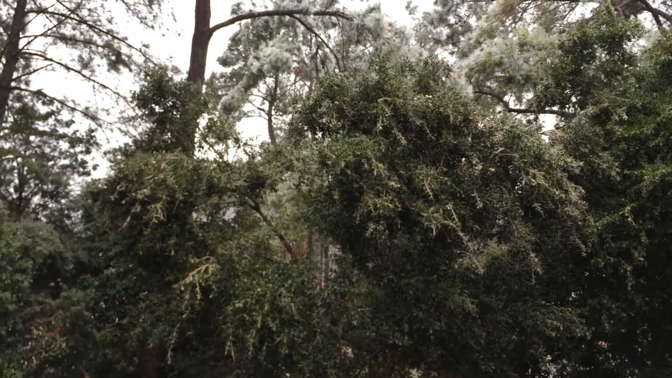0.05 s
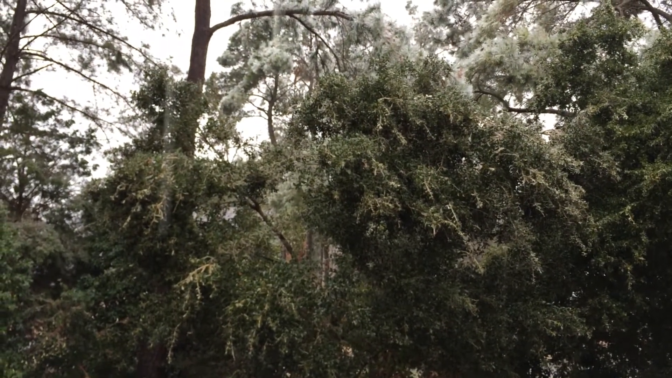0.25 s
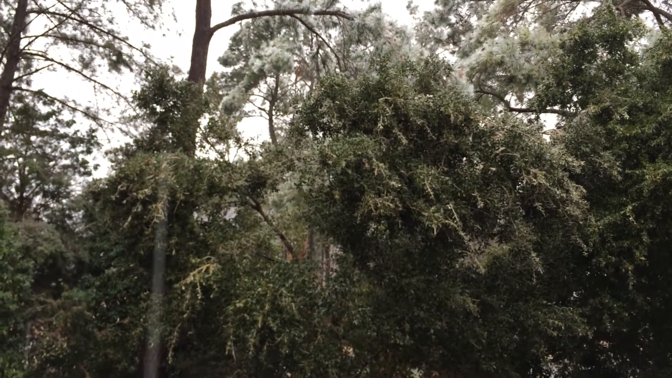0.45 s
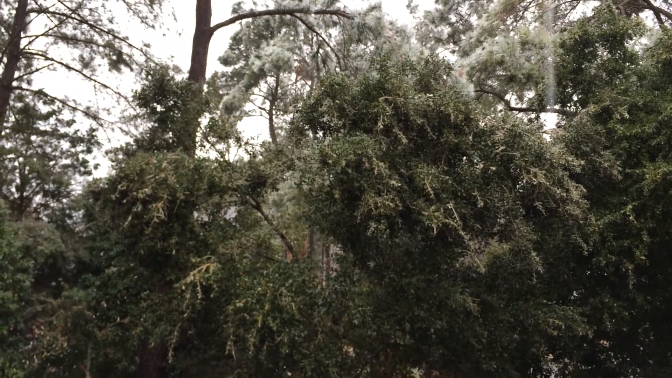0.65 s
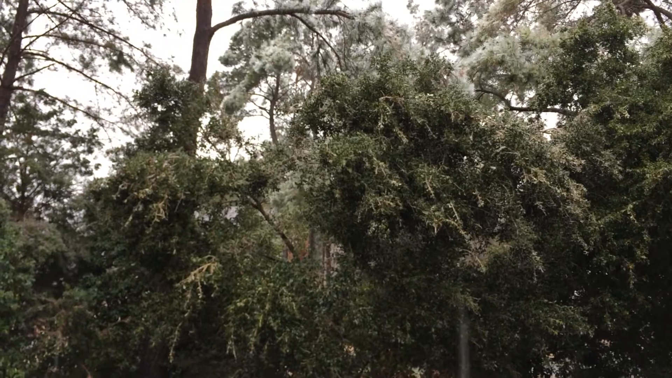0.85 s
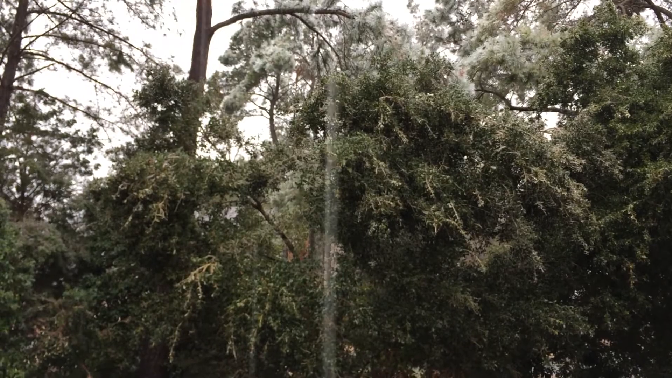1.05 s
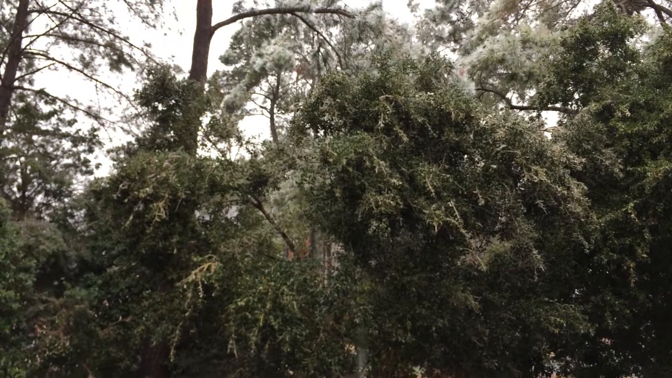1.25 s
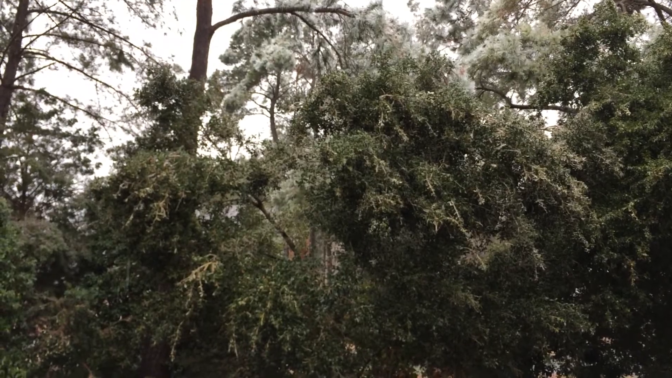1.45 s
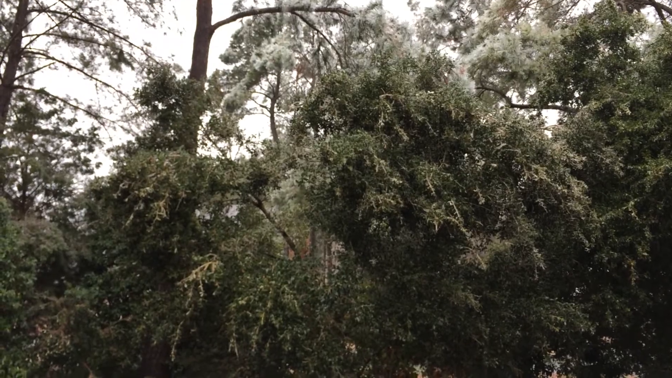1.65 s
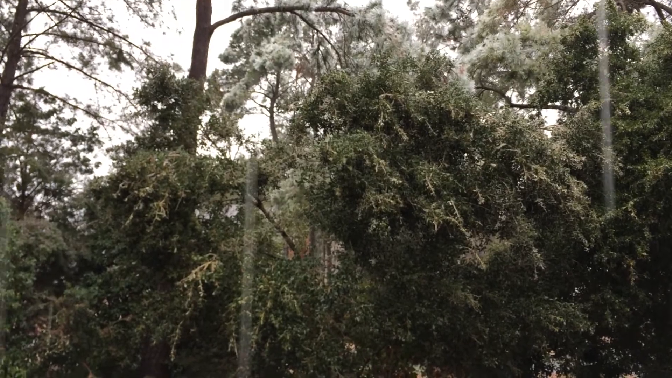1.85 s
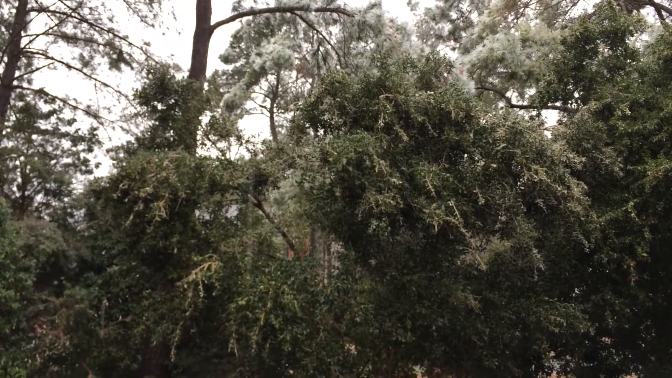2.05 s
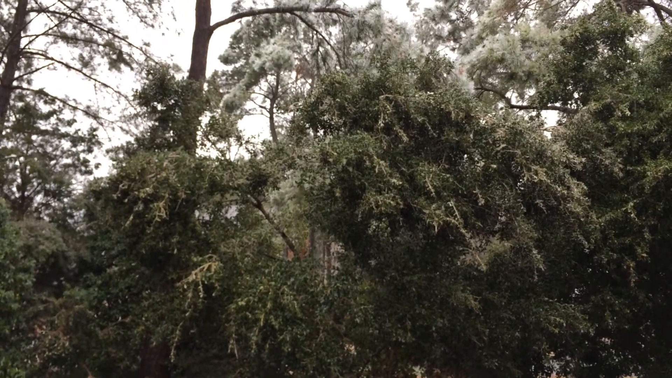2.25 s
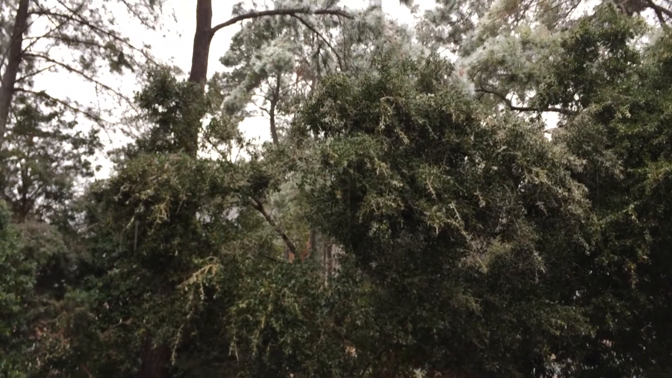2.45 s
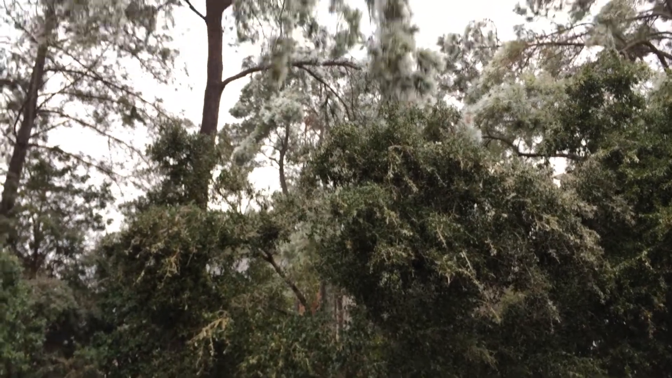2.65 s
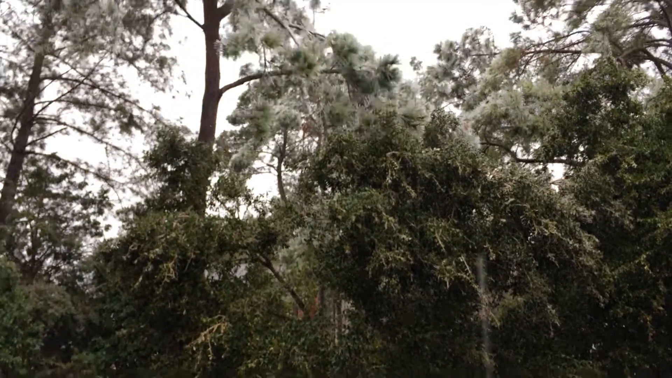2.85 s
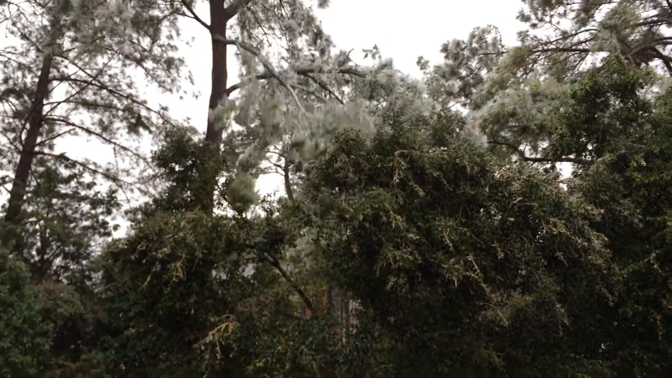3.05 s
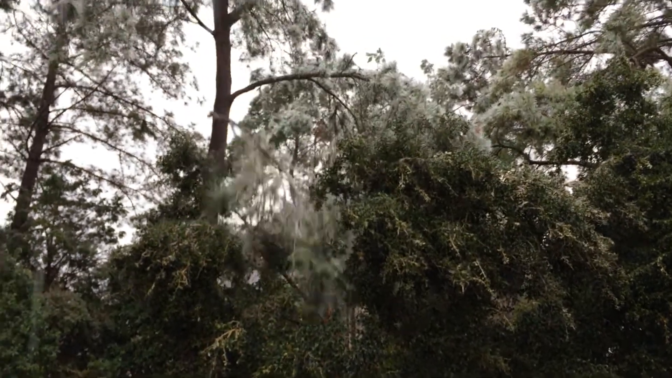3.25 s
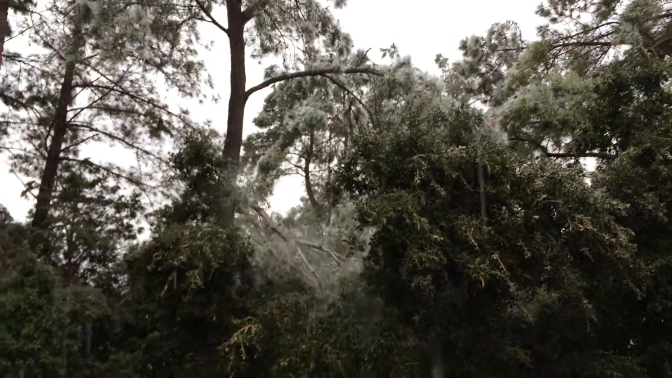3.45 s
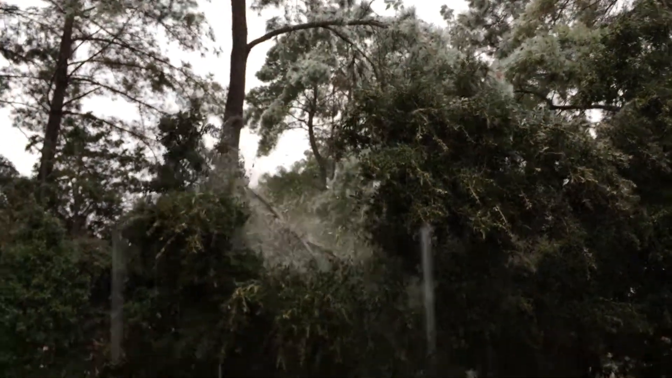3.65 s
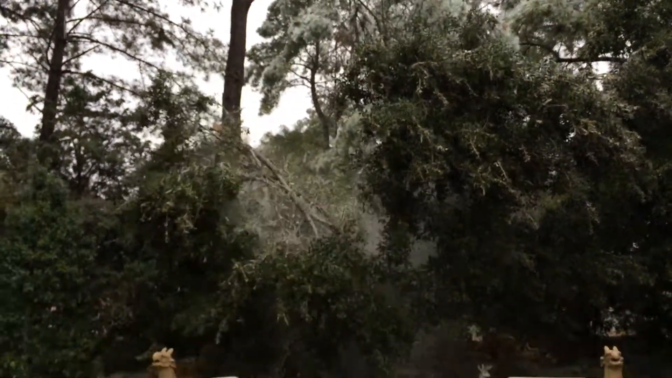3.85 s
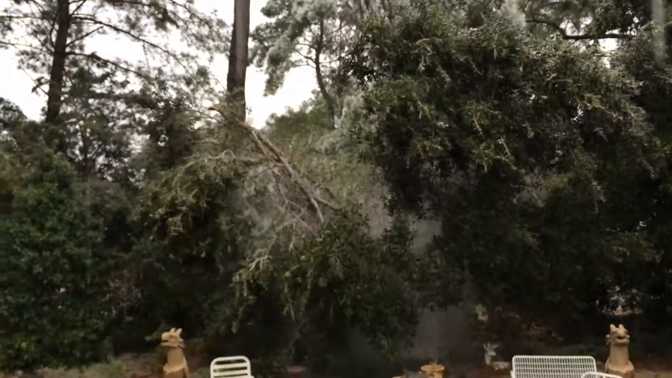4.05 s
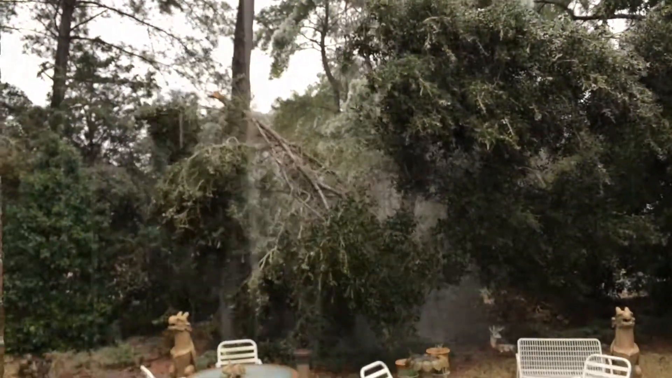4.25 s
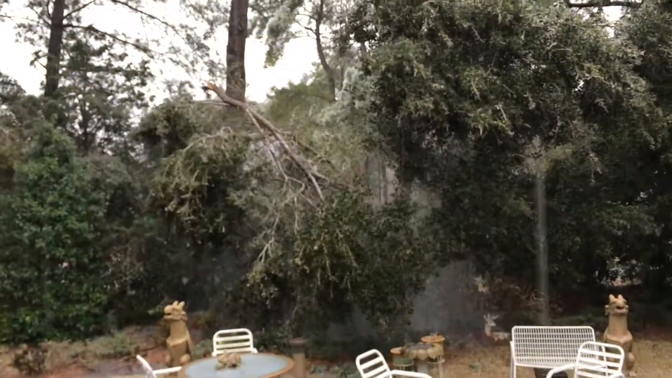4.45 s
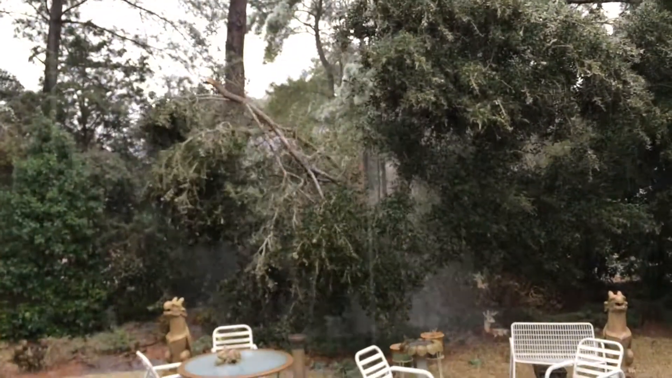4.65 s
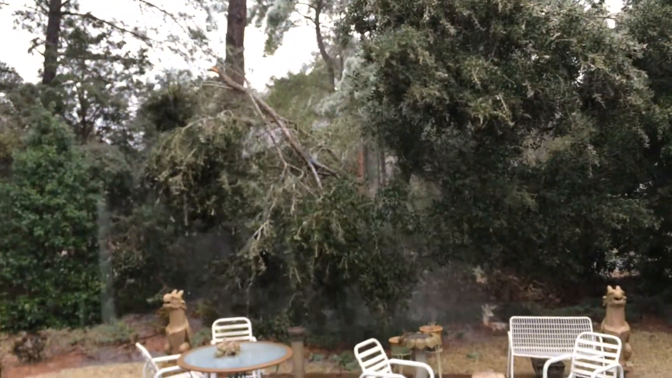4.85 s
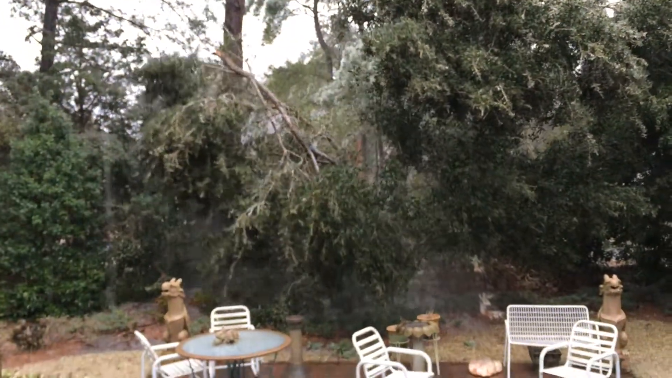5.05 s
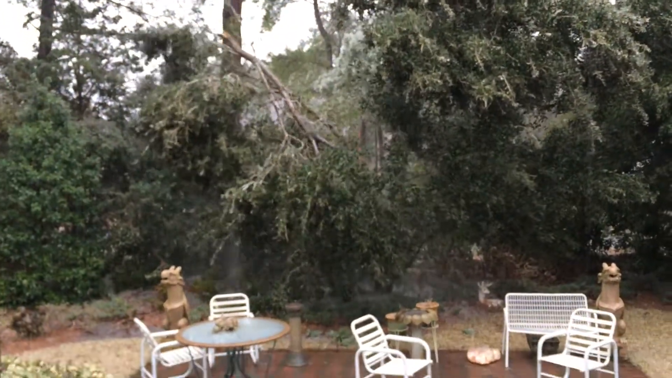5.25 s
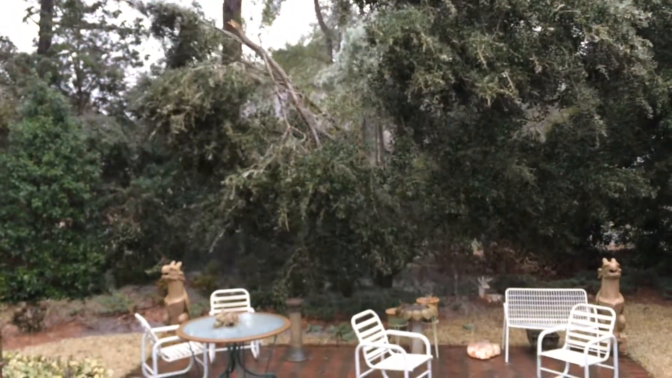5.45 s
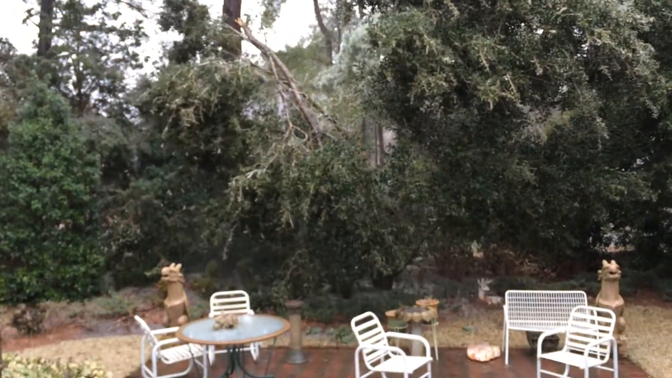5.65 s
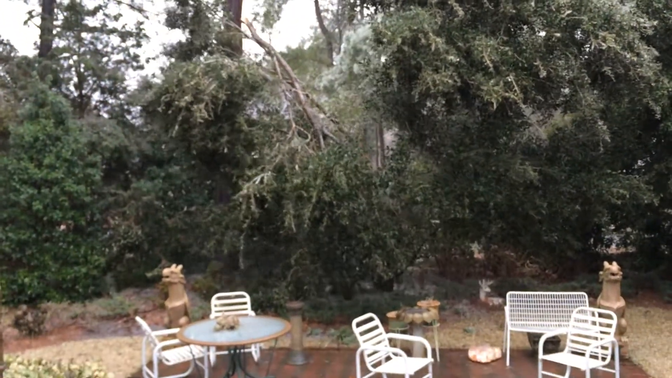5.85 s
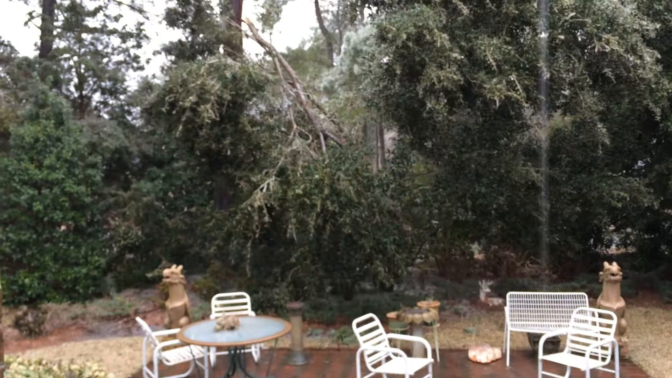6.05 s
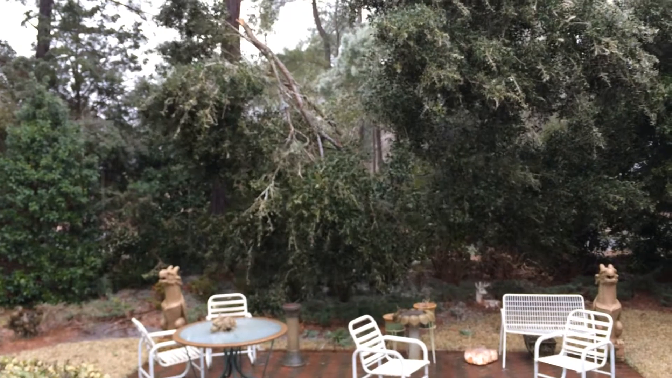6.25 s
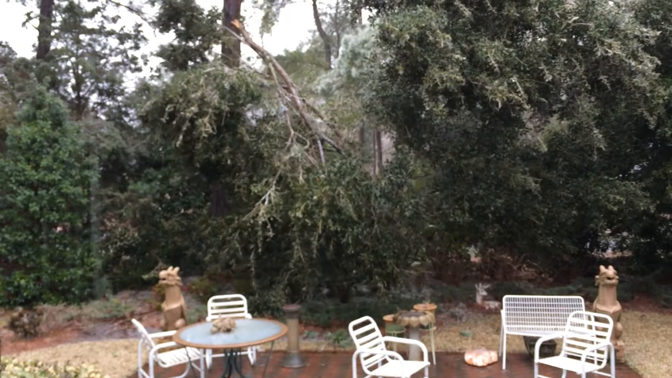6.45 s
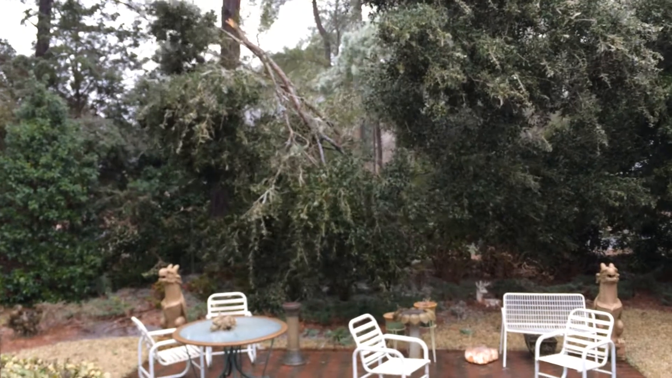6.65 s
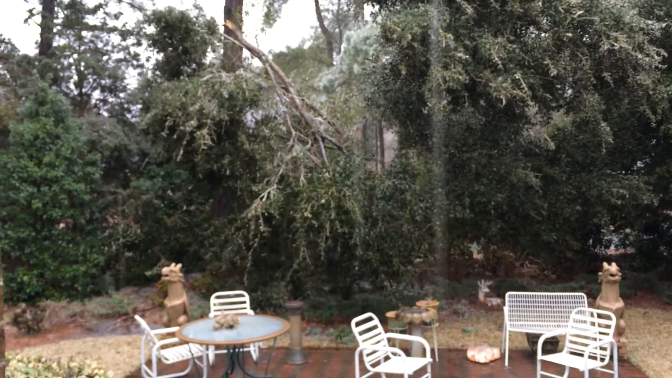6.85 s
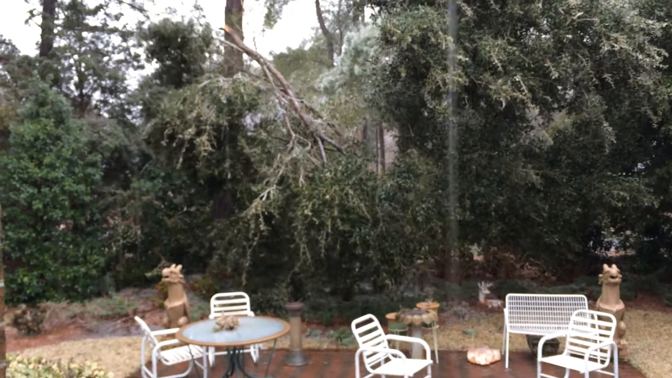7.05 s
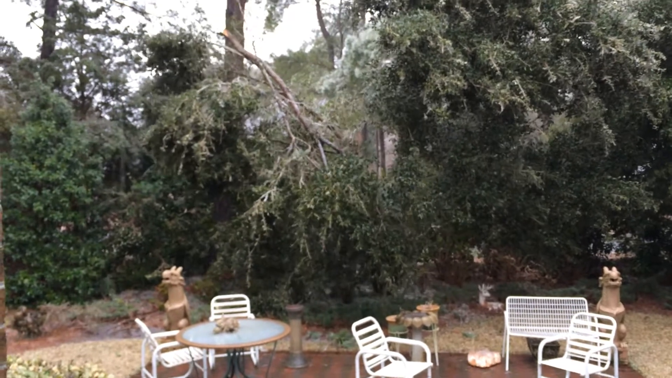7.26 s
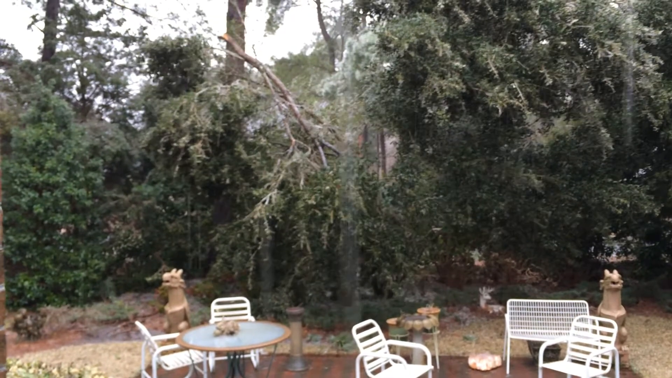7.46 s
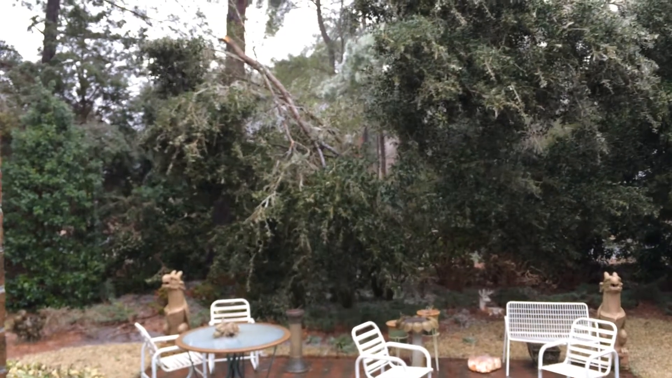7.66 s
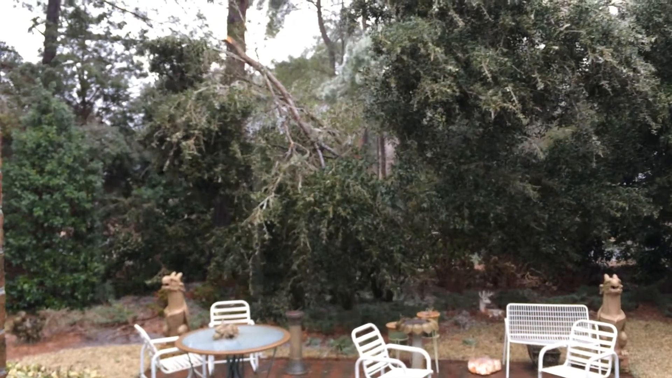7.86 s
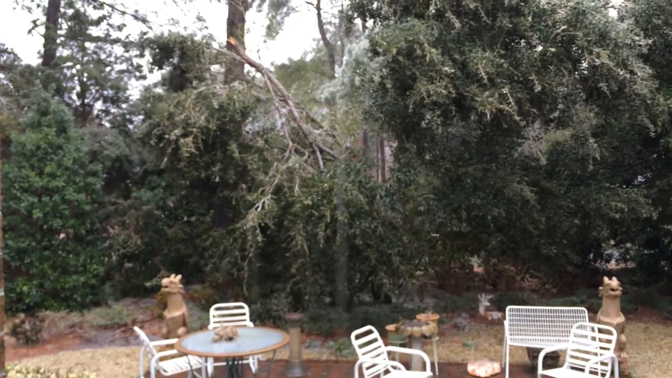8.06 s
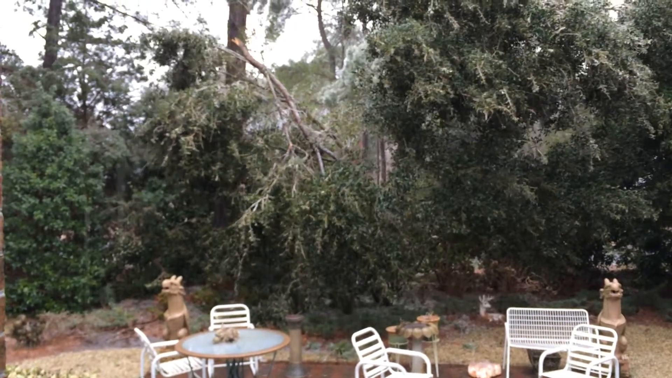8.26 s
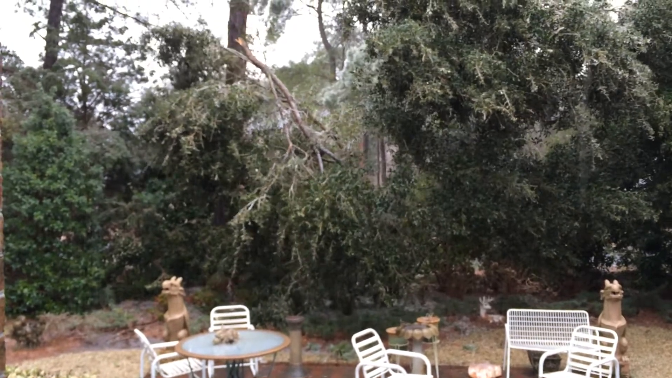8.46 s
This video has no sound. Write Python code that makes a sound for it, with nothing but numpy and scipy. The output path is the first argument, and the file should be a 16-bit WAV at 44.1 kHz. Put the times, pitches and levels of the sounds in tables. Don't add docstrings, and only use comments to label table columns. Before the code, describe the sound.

Quiet dripping and distant engine hum, then sharp wood snaps and tearing fibres, a branch crash, and a rush of falling ice thinning into drops.

```python
import sys
import numpy as np
from scipy import signal
from scipy.fft import rfft, irfft
from scipy.io import wavfile
from scipy.ndimage import uniform_filter1d

SR = 44100
rng = np.random.default_rng(int(sys.argv[2]) if len(sys.argv) > 2 else 0)


def gain_from_decibels(decibels):
    exponent = np.asarray(decibels, float) / 20
    return 10 ** exponent


def generate_wav(signal):
    frames = np.transpose(np.atleast_2d(signal))
    scaled = np.clip(frames, -1, 1) * 32767
    pcm = np.round(scaled).astype(np.int16)
    wavfile.write(sys.argv[1], SR, pcm)


N = 375732
T = np.arange(N) / SR


def unit(x):
    return x / np.sqrt(np.mean(x ** 2))


def colour(x, points, causal=False):
    hz, db = np.transpose(points)
    f = np.maximum(np.arange(N // 2 + 1) * SR / N, 1)
    gain = gain_from_decibels(np.interp(np.log(f), np.log(hz), db, left=-60))
    if causal:
        cepstrum = irfft(np.log(gain), N)
        fold = 2 * (np.arange(N) < N // 2) - (np.arange(N) == 0)
        gain = np.exp(rfft(cepstrum * fold))
    return irfft(rfft(x) * gain, N)


def band(x, hz, octaves):
    edges = np.clip([hz / 2 ** (octaves / 2), hz * 2 ** (octaves / 2)], 40, 0.45 * SR)
    return signal.sosfilt(signal.butter(2, edges, "band", fs=SR, output="sos"), x)


def grains(count, rate, spread_db):
    hit = rng.random(count) < rate / SR
    strength_db = spread_db * np.minimum(rng.exponential(size=count), 4)
    return unit(hit * rng.standard_normal(count) * gain_from_decibels(strength_db) + 1e-9)


def walk(rate):
    k = int(SR / rate)
    steps = np.repeat(rng.standard_normal(N // k + 1), k)
    return 0.94 * uniform_filter1d(uniform_filter1d(steps, k), k)[:N]


def fade(t, t60):
    return np.exp(-np.log(1000) * t / max(t60, 0.004))


def add(out, s, x, db):
    i = int(s * SR)
    x = x[:N - i]
    out[i:i + len(x)] += x * gain_from_decibels(db) / np.abs(x).max()


# frequency in Hz, strength in dB per Hz.
RAIN_TONE = [(330, -21.5), (359, -26), (492, -25), (1080, -29), (1200, -28.5), (3490, -36.5), (14300, -41),
             (15500, -35)]


def rain():
    far = rng.standard_normal(N) + 0.4 * grains(N, 1500, 2.0)
    hiss = unit(colour(far, RAIN_TONE))
    patches = np.zeros(N)
    for hz in [4500, 7000, 10500, 14500]:
        patches += band(hiss, hz, 0.6) * (gain_from_decibels(2.0 * walk(22)) - 1)
    return (hiss + patches) * gain_from_decibels(-52)


# time in
# seconds, level in dB.
GENERATOR_LEVEL = [(0.0, -45.5), (0.97, -46), (1.95, -46), (2.28, -50), (2.56, -41.5), (2.96, -52.5),
                   (3.18, -49), (3.77, -51), (4.44, -47.5), (6.17, -44.5), (6.79, -45.5), (6.95, -48.5),
                   (7.59, -53.5), (7.81, -50.5), (8.07, -45.5), (8.52, -45.5)]
# frequency in Hz, strength in dB per Hz.
EXHAUST_TONE = [(15, -40), (30, -30), (45, -4), (60, 0), (90, 0), (150, -12), (210, -24), (600, -55)]
# frequency in Hz, strength in dB per Hz.
RUMBLE_TONE = [(20, -39), (45, 5.5), (120, 2), (200, -9), (300, -13), (420, -26), (700, -43)]


def generator():
    firing_hz = 29.97
    k = np.arange(N // 1450)
    weak = k % 2
    chance = rng.standard_normal((len(k), 2))
    fire_s = k / firing_hz + 0.01434 + 0.00028 * weak + 0.0005 * chance[:, 0]
    pulses = np.zeros(N + SR)
    pulses[(fire_s * SR).astype(int)] = -gain_from_decibels(1.5 * chance[:, 1] - 2.2 * weak)
    beat = unit(colour(pulses[:N], EXHAUST_TONE, causal=True))
    rumble = unit(colour(rng.standard_normal(N), RUMBLE_TONE))
    level_db = np.interp(T, *np.transpose(GENERATOR_LEVEL)) + 2.0
    return (beat + gain_from_decibels(-6.5) * rumble) * gain_from_decibels(level_db)


# start in seconds, peak in dB, ring in Hz.
ICE_KNOCKS = [
    (0.872, -41.5, 633),
    (2.263, -40, 1700),
    (2.817, -25, 1550),
    (7.876, -37, 1470),
    (8.106, -39, 1140),
]


def knocks():
    out, t = np.zeros(N), T[:SR // 4]
    for s, db, hz in ICE_KNOCKS:
        add(out, s, band(rng.standard_normal(len(t)) * fade(t, 0.17), hz, 1.0), db)
    return out


# start in seconds, strike in
# dB, centre in Hz, spray in dB against the strike before its common lowering.
MELT_DROPS = [(0.1162, -45.5, 7500, 11), (0.2068, -20.5, 6470, 1.5), (0.2998, -28, 6770, 2),
              (0.409, -32, 6200, 3), (0.4927, -29.5, 5240, 1.5), (0.57, -41, 12000, 3),
              (0.7977, -39, 11500, 0), (0.8245, -44, 6600, 12), (0.936, -39, 12300, 9),
              (0.9839, -33, 5100, 3), (1.0482, -28, 6500, -3), (1.1696, -34, 10000, -1),
              (1.2022, -42, 7300, 11), (1.2621, -31, 10600, 4), (1.3188, -42, 11500, -9),
              (1.3817, -30, 11500, -2), (1.42, -29, 10900, 1), (1.4867, -32, 10200, -12),
              (1.4924, -27.5, 6100, 3.5), (1.6511, -41, 6700, 6), (1.7148, -33, 11000, 4),
              (1.788, -26.5, 5830, 0), (1.802, -17, 11300, -1), (1.9141, -27.5, 6800, -4),
              (1.936, -33, 12300, 10), (1.9615, -35, 6500, -12), (1.9834, -38, 7560, 8),
              (0.5058, -35, 9100, 4), (0.222, -31, 7500, 10), (2.339, -24.5, 9000, 2),
              (5.4964, -18, 4300, 2.5), (5.8045, -16.5, 8500, -3), (5.9127, -23, 9300, -12),
              (6.0144, -23, 5400, 3.5), (6.378, -29, 4600, 7), (6.4514, -21, 12300, -12),
              (6.7762, -24, 11500, 1), (6.8016, -31, 4500, 4), (6.891, -31, 4000, 3),
              (6.9434, -26, 9300, -12), (6.9936, -15.5, 4170, -1), (7.0162, -26, 6600, -12),
              (7.1737, -23, 5800, 0), (7.257, -24, 7500, 3), (7.376, -22, 5960, 1),
              (7.3824, -10.5, 10900, -6), (7.491, -26, 5070, 0), (7.6067, -23, 11300, -5),
              (7.6513, -28, 12000, -1), (7.6991, -10.5, 7900, -4), (7.8576, -20.5, 5000, 5),
              (7.864, -19, 5760, -10), (7.9175, -17.5, 4660, -1), (7.925, -12, 3540, 0.5),
              (8.0668, -15.5, 11860, -2.5), (8.2344, -34, 6600, 1), (8.3132, -22.5, 5400, -4),
              (8.385, -28, 4500, 3.5), (8.4966, -35, 7000, 0), (8.5139, -28, 5200, -12)]


def drips():
    spray_s, spray_level_db = 0.125, -7.5
    echo_s, echo_db = 0.0032, -6.5
    out, t = np.zeros(N), T[:SR // 4]
    for s, db, hz, spray_db in MELT_DROPS:
        tick = (np.arange(400) == 0) + 0.46 * rng.standard_normal(400) * fade(t[:400], 0.002)
        add(out, s - 0.0001, band(tick, hz, 1.8), db)
        spatter = 0.8 * grains(len(t), 900, 1.5) + rng.standard_normal(len(t))
        burst = spatter * fade(t, spray_s) * (1 - np.exp(-t / 0.0012))
        spray = band(burst, hz, 1.0) + 0.36 * band(burst, 5540, 3.0)
        add(out, s, spray, db + spray_db + spray_level_db)
    lag = int(echo_s * SR)
    out[lag:] += gain_from_decibels(echo_db) * out[:-lag]
    return out


# time in seconds, level in dB.
ICE_AMOUNT = [(2.25, -49), (2.8, -43), (3.0, -31), (3.25, -21.5), (3.72, -21), (3.93, -27), (4.41, -27.5),
              (5.55, -33.5), (6.45, -41.5), (7.0, -47), (8.52, -52.5)]


def icefall():
    shake_db, shake_s = -26.5, 0.69
    power = gain_from_decibels(2 * np.interp(T, *np.transpose(ICE_AMOUNT), left=-99))
    for s, db, *_ in FIBRE_CRACKS:
        power[int(s * SR):][:SR] += gain_from_decibels(2 * (db + shake_db)) * fade(T[:SR], shake_s) ** 2
    return 10 * np.log10(power)


# frequency in Hz, strength in dB per Hz.
TINKLE_TONE = [(880, -17), (1500, -2.5), (1900, -0.5), (2260, -1.5), (3060, 2), (6820, 3), (14600, -12.5),
               (15500, -2.5)]
# frequency in Hz, strength in dB per Hz.
LUMP_TONE = [(150, -10.5), (300, -6.5), (600, -5), (1200, 0.5), (2200, -13), (4000, -35)]
# frequency in Hz, strength in dB per Hz.
SHARD_TONE = [(6000, -11), (9000, -1), (12000, -0.5), (15500, -3)]


def shower():
    full_db = -22
    tinkle_db = icefall()
    shard_db = full_db - 2 + 1.0 * (tinkle_db - full_db)
    late_db = np.roll(tinkle_db, int(0.023 * SR))
    lump_db = full_db - 15.5 + 0.87 * (late_db - full_db)

    rate = np.interp(T, [3.5, 7.0], [26000, 9000])
    thinning = np.sqrt(rate / rate.mean())
    ice = grains(N, rate, 0.8) * gain_from_decibels(0.5 * walk(20)) / thinning
    shards = grains(N, rate, 0.8) * gain_from_decibels(0.5 * walk(20)) / thinning
    beads = sum(band(grains(N, 70, 1.5), hz, 0.2) for hz in [2900, 3700, 4500, 5400, 6600])
    lumps = (grains(N, 2500, 2.0) + 0.6 * rng.standard_normal(N)) * gain_from_decibels(1.5 * walk(18))

    tinkle = unit(colour(ice, TINKLE_TONE)) + 0.17 * unit(beads)
    out = tinkle * gain_from_decibels(tinkle_db + 1.0)
    out += unit(colour(lumps, LUMP_TONE)) * gain_from_decibels(lump_db)
    out += unit(colour(shards, SHARD_TONE)) * gain_from_decibels(shard_db)
    return out


# start in seconds, peak in dB.
TRUNK_THUD = (2.02, -19)
# frequency in Hz, level in dB, time to die away in seconds.
TRUNK_TONES = [(151.6, -6, 0.2), (184, -12, 0.24), (266, 4, 0.097), (297, -5, 0.15), (760, 8, 0.07)]


def trunk_thud():
    out, t = np.zeros(N), T[:SR // 2]
    shudder = sum(np.sin(2 * np.pi * hz * t) * gain_from_decibels(db) * t * fade(t, t60) for hz, db, t60 in TRUNK_TONES)
    start_s, peak_db = TRUNK_THUD
    add(out, start_s, shudder, peak_db)
    return out


# start in seconds, level in dB, centre in Hz, treble in dB.
FIBRE_CRACKS = [(2.015, -7, 1620, -5), (2.03, -8.5, 750, 0.5), (2.047, -19, 418, 8.5),
                (2.067, -25, 1800, 1), (2.155, -22, 1090, 0), (2.205, -34, 1530, -3),
                (2.261, -28.5, 1330, -13), (2.387, -28, 1100, -1.5), (2.416, -18, 1340, 0),
                (2.443, -16, 1480, -1.5), (2.528, -24.5, 1720, 2), (2.576, -9, 1210, -5),
                (2.635, -14.5, 1560, -1), (2.652, -15, 1020, 5), (2.672, -30.5, 1500, 14),
                (2.775, -25, 650, -19), (2.814, -20.5, 1500, -12), (2.873, -24.5, 1395, -2),
                (2.903, -20.5, 1460, 1), (2.917, -20, 1345, 2), (2.944, -38, 990, 14),
                (3.156, -19, 1210, 3), (3.395, -13, 1720, 8.5), (3.477, -3, 1340, -5),
                (3.543, -22, 1420, -3), (3.741, -9, 1150, 1), (3.851, -12, 990, 3)]


def tearing_fibres():
    out, t = np.zeros(N), T[:SR // 2]
    for s, db, hz, treble_db in FIBRE_CRACKS:
        if s < 2.06:
            bass_db, tail_s = -9, 0.088
        elif s < 3.3:
            bass_db, tail_s = -17, 0.19
        else:
            bass_db, tail_s = -14.5, 0.076
        fibres = grains(len(t), 5000, 1.35)
        swell = fade(t, tail_s) * (1 - np.exp(-t / 0.0039))
        treble = unit(band(fibres, 2620, 1.34) + 0.47 * band(fibres, 3600, 1.84))
        wood = unit(band(fibres, hz, 1.15)) + gain_from_decibels(treble_db) * treble
        wood += gain_from_decibels(bass_db) * unit(band(fibres, 423, 0.82)) * 2.07 * (1 - np.exp(-t / 0.0047))
        out[int(s * SR):][:len(t)] += gain_from_decibels(db - 6.5) * wood * swell
    return out


# start in seconds, peak in dB, ring in Hz, time for the ring to die in seconds, treble in dB.
WOOD_SNAPS = [(2.005, -26, 1940, 0.081, -9), (2.016, -8, 1790, 0.015, -8), (2.152, -18.5, 1080, 0.018, -2),
              (2.205, -27, 1530, 0.022, 2), (2.263, -31, 1840, 0.016, -18), (2.418, -6.5, 2720, 0.021, -7),
              (2.443, -14, 1600, 0.021, 6), (2.529, -15, 1770, 0.025, -9), (2.575, -5, 1020, 0.036, -9),
              (2.636, -6, 2780, 0.039, -6), (2.653, 1.5, 2980, 0.0089, -20), (2.773, -19.5, 630, 0.036, -8),
              (2.817, -13.5, 1470, 0.022, -25), (2.904, -19, 1440, 0.032, 7),
              (2.915, -19.5, 2800, 0.04, 7.5), (3.394, -11, 2080, 0.025, -19), (3.398, -6, 2740, 0.02, -15),
              (3.421, -16, 2890, 0.025, -5), (3.478, -5.5, 3300, 0.02, 1), (3.74, -8, 3060, 0.022, -13),
              (3.851, -12.5, 3380, 0.015, -11)]


def snaps():
    out, t = np.zeros(N), T[:SR // 2]
    for s, db, hz, t60, treble_db in WOOD_SNAPS:
        click = (np.arange(len(t)) == 0) + 1.35 * rng.standard_normal(len(t)) * fade(t, 0.0026)
        ring = np.sin(2 * np.pi * hz * t) * fade(t, t60)
        body = 0.3 * ring + band(click, hz, 0.86) + 1.37 * band(click, 1310, 2.12)
        add(out, s + 0.000966, body, db)
        add(out, s + 0.00106, band(click, 5800, 0.82), db + treble_db)
    return out


def limb():
    return snaps() + tearing_fibres() + trunk_thud()


def yard_echo(wood):
    t60_s, level_db = 0.54, -11.5
    t = T[:SR]
    echo = np.zeros(SR)
    for hz, share in [(400, 0.74), (1300, 1.3), (4000, 1.2), (10000, 0.17)]:
        echo += band(rng.standard_normal(SR), hz, 2.95) * fade(t, t60_s * share)
    echo = unit(echo * (1 - np.exp(-t / 0.0082))) / np.sqrt(SR)
    return gain_from_decibels(level_db) * signal.fftconvolve(wood, echo)[:N]


def scene():
    wood = limb()
    mono = rain() + generator() + knocks() + drips() + shower() + wood + yard_echo(wood)
    return np.array([mono, mono])


def stray_noise(cut):
    from_s, to_s, low_hz, high_hz, width_hz = 3.0, 5.4, 4100, 12500, 1400
    side, size = np.zeros(N), 2048
    window = np.sin(np.pi * np.arange(size) / size)
    for when, where in rng.random(size=(23, 2)):
        i = int((from_s + when * (to_s - from_s)) * SR)
        edge_hz = low_hz + where * (high_hz - low_hz)
        sos = signal.butter(6, [edge_hz, edge_hz + width_hz], "band", fs=SR, output="sos")
        loud = signal.sosfilt(sos, cut[0, i:i + size]).std()
        noise = unit(signal.sosfilt(sos, rng.standard_normal(size)))
        side[i:i + size] += 0.5 * loud * noise * window
    return np.array([side, -side])


def band_limit(x):
    return signal.sosfilt(signal.butter(12, 16630, fs=SR, output="sos"), x)


def record(dry):
    rounded = np.tanh(1.162 * dry) / 1.06
    top_cut = signal.ellip(10, 0.2, 45, 15420, fs=SR, output="sos")
    cut = signal.sosfilt(top_cut, rounded)
    return band_limit(cut + stray_noise(cut))


dry = scene()
out = record(dry)
generate_wav(out)
```